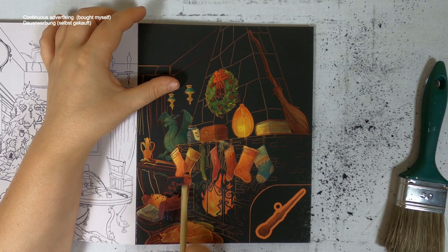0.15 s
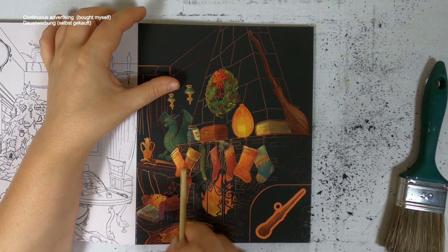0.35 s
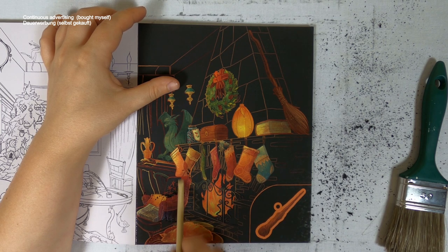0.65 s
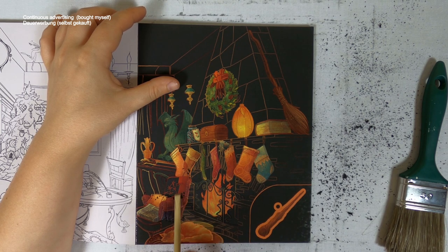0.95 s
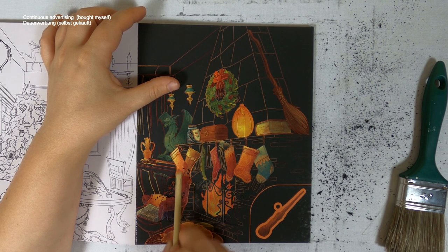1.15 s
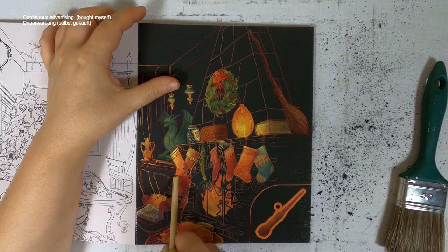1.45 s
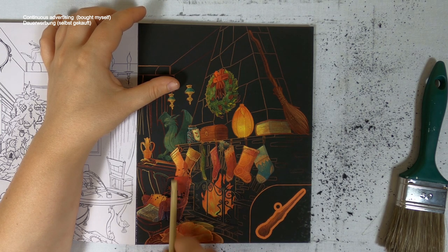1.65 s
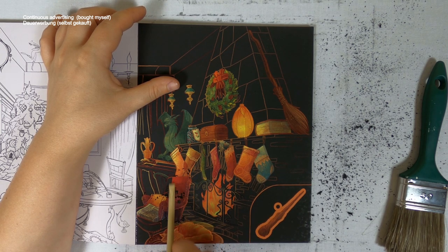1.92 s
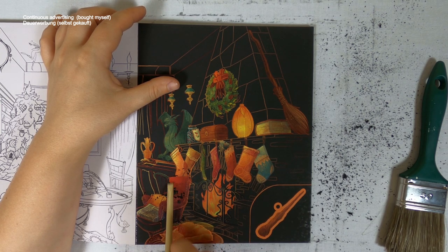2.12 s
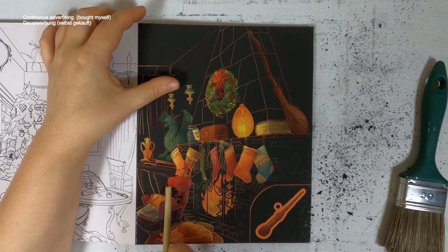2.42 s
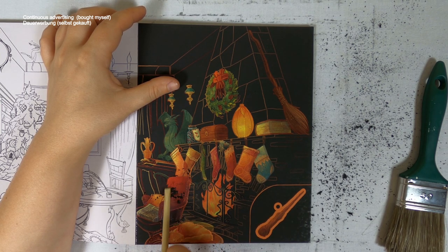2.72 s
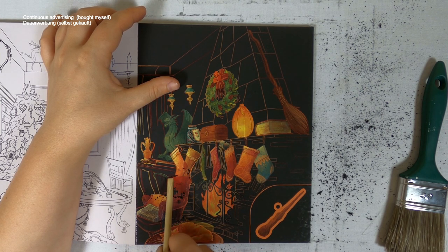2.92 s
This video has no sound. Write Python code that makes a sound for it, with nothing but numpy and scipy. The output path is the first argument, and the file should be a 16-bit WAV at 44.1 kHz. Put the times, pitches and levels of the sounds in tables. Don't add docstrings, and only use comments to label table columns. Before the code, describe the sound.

Close, dry scratching of a stick over card on a table: quick uneven strokes about three per second, stuttering catches, small knocks and gritty hiss, loudest in the first half, with faint low table thumps behind.

```python
import sys
import numpy as np
from scipy import signal
from scipy.fft import rfft, irfft, next_fast_len
from scipy.io import wavfile
from scipy.ndimage import uniform_filter1d, map_coordinates

SR = 44100
rng = np.random.default_rng(int(sys.argv[2]) if len(sys.argv) > 2 else 0)


def inscribe(sig):
    pcm = np.round(np.clip(np.atleast_2d(sig).T, -1, 1) * 32767)
    wavfile.write(sys.argv[1], SR, pcm.astype(np.int16))


def elevation(decibels):
    levels = np.asarray(decibels, float)
    return 10 ** (levels / 20)


N = 134505
T = np.arange(N) / SR

# frequency in Hz, level in dB per Hz.
AIR_SPECTRUM = [(95, -28.5), (145, 0), (330, -2.5), (700, -14.5), (2300, -23), (4000, -29.5), (8500, -31.5),
                (15600, -41)]
# time in seconds, gain in dB.
AIR_GAIN = [(0, 1), (.5, -0.5), (1.3, 1), (2.0, -1), (3.05, -1.5)]
AIR_DB, AIR_SWAY_DB = -65.5, 0.8
WHINE_HZ, WHINE_DB = 9950, -95

# frequency in Hz, level in dB per Hz.
ARM_SPECTRUM = [(12, -27), (22, -0.5), (40, 1), (52, -11.5), (85, -15.5), (105, -46), (200, -86)]
# time in seconds, level in dB.
ARM_EFFORT = [(0.0, -84), (0.14, -69.5), (0.25, -93), (0.74, -60), (0.79, -74), (0.87, -58.5), (0.96, -84),
              (1.05, -67), (1.24, -84), (1.44, -64), (1.63, -86), (1.83, -65), (1.9, -91), (1.95, -72.5),
              (2.46, -86), (2.6, -71), (2.77, -70.5), (2.9, -83), (3.05, -85)]
ARM_SWAY_DB = 2.5

# start in seconds, level in dB.
WRIST_NUDGES = [
    (0.576, -42.5),
    (1.301, -48),
    (1.776, -46),
    (0.289, -58),
    (0.779, -55.5),
    (1.93, -58),
    (2.52, -56.5),
    (2.8, -54),
]
NUDGE_T60 = 0.26

# centre in Hz, width in Hz, level in dB.
TABLE_MODES = [(35, 21, -13), (148, 22.4, 2.5), (242, 200, -10.5)]
# centre in Hz, width in Hz, level in dB.
CARD_MODES = [(265.7, 19.6, -10), (331.5, 18.2, -2.5), (397.2, 21, -5.5), (474, 36, -7), (619.4, 49, -3),
              (729, 59.7, -1.5), (842, 76, -6.5), (937.4, 55, -7), (1087, 151, -9), (1250, 96, -5.5),
              (1354.5, 57, -9.5), (1491, 49, -16), (1694, 54, -18.5), (1980, 30, -23.5)]
# centre in Hz, width in Hz, level in dB.
STYLUS_MODES = [(3460, 410, 3.5), (4700, 290, -8.5), (6250, 340, -1.5), (8800, 1200, -1.5),
                (12200, 410, -12)]
# centre in Hz, width in Hz, level in dB.
POINT_MODES = [(4630, 880, -0.5), (9120, 640, -5), (12140, 910, -7.5)]
# centre in Hz, width in Hz, level in dB.
SQUEAL_MODES = [(1250, 145, -3), (1460, 79, 0), (2760, 250, -13)]

# start in seconds, level in dB.
SKIDS = [
    (.185, -63),
    (.34, -60.5),
    (.372, -50),
    (0.428, -50.5),
    (0.769, -45.5),
    (1.1, -50),
    (1.134, -53),
]
SKID_T60 = 0.18

# time in seconds, peak in dB.
JOLTS = [(0.3984, -42.5), (0.5749, -28), (0.6241, -32.5), (.7445, -37.5), (.75, -40), (0.7628, -29.5),
         (.766, -37.5), (.96, -36.5), (1.0995, -29.5), (1.143, -43), (1.296, -32.5), (1.271, -42),
         (1.422, -43), (1.464, -38), (1.48, -38.5), (1.495, -44), (1.582, -43), (1.604, -40),
         (1.776, -40.5), (1.85, -38), (1.911, -51), (2.61, -53), (1.892, -42), (2.053, -41), (2.075, -40),
         (2.2, -57), (2.472, -36), (2.484, -42), (2.761, -44)]
CONTACT_S, JOLT_RING_DB, JOLT_SNAP_DB = 0.0002, 22.5, -4

# start in seconds, length in seconds, level in dB.
PUSHES = [
    (0.196, 0.095, -73),
    (0.537, 0.11, -57.5),
    (.9, 0.097, -59.5),
    (1.263, 0.095, -61),
    (1.557, .1, -65.5),
    (1.85, 0.098, -68),
    (2.153, 0.11, -71),
    (2.443, .1, -70),
    (2.73, 0.11, -73.5),
]

# time in seconds, peak in dB.
FLAKES = [(.375, -46.5), (0.397, -42.5), (0.5534, -44.5), (.5816, -58), (0.735, -50), (0.907, -49.5),
          (0.977, -52), (1.0846, -46), (1.275, -55), (1.8946, -65), (2.0503, -67), (2.465, -58),
          (0.7666, -36.5), (1.1038, -45), (1.1413, -44), (1.4253, -57), (1.494, -51), (1.588, -62),
          (1.655, -56), (1.7761, -54.5), (2.0761, -51.5), (2.7633, -57)]
FLAKE_DB, FLAKE_T60 = 5, 0.012

# start in seconds, length in seconds, hiss in dB, rasp in dB.
STROKES = [(.0, 0.097, -68, -61), (0.047, 0.086, -69, -56.5), (0.199, 0.097, -60, -47.5),
           (0.329, 0.055, -72, -59), (0.362, 0.085, -53, -51.5), (0.54, 0.1, -49, -39),
           (0.697, 0.088, -54.5, -43.5), (0.8, 0.3, -90, -61.5), (0.89, 0.12, -52.5, -48.5),
           (1.024, 0.2, -94, -60), (1.067, 0.11, -58, -56), (1.264, 0.094, -53.5, -42),
           (1.4, 0.057, -69, -47), (1.447, 0.07, -60.5, -42.5), (1.546, 0.11, -61.5, -43.5),
           (1.705, 0.069, -90, -58.5), (1.751, 0.053, -71, -50.5), (1.839, 0.11, -65, -45),
           (1.995, 0.07, -91, -58), (2.034, 0.066, -67.5, -49), (2.137, 0.1, -67, -46),
           (2.289, 0.099, -86, -60), (2.43, 0.11, -67, -48), (2.577, 0.093, -85, -61.5),
           (2.739, 0.099, -68, -53), (2.862, 0.12, -80.5, -60)]
RASP_RISE_S, HISS_RISE_S, FALL_S = 0.014, 0.026, 0.037
SWELL, HISS_LATE = 0.55, 1.6

# start in seconds, length in seconds, level in dB,
# first slip rate in Hz, last slip rate in Hz.
CATCHES = [(0.218, 0.03, -41, 1199, 680), (0.245, 0.048, -48, 480.5, 330), (0.366, 0.015, -34.5, 1394, 774),
           (0.387, 0.023, -33, 1366, 745), (0.549, 0.016, -31, 1105, 930), (0.561, 0.022, -32.5, 728, 696),
           (0.589, 0.039, -39.5, 777, 658), (0.605, 0.038, -38, 433, 341), (.712, .024, -35.5, 944, 795),
           (0.739, 0.018, -33.5, 794, 740), (0.738, 0.0137, -31, 1053, 1190),
           (0.759, 0.012, -30.5, 1323, 1153), (0.896, 0.033, -33.5, 1322, 681),
           (0.935, 0.038, -33, 1204, 628), (.946, 0.017, -35.5, 1323, 1250),
           (1.075, 0.0322, -35, 1150, 700), (1.118, 0.026, -37.5, 1057, 622), (1.27, 0.023, -33, 1331, 792),
           (1.284, 0.019, -34.5, 745, 730), (1.324, 0.069, -49, 423, 325), (1.402, 0.0314, -44.5, 694, 499),
           (1.458, 0.013, -35.5, 778, 646), (1.469, 0.036, -43, 514, 369),
           (1.573, 0.042, -41.5, 596.6, 848), (1.595, 0.053, -44.5, 498.6, 362),
           (1.752, 0.034, -42, 779.6, 722), (1.841, 0.04, -43.5, 447.6, 390),
           (1.878, 0.027, -44.5, 765, 681), (1.898, 0.042, -47.5, 410, 347), (2.039, 0.024, -38, 776, 665),
           (2.045, 0.036, -44.5, 441, 402), (2.149, 0.045, -40.5, 478.5, 423),
           (2.182, 0.052, -43.5, 404, 314.3), (2.42, 0.054, -47, 439.4, 486), (2.464, 0.026, -39, 830, 572),
           (2.488, 0.037, -44.5, 418.5, 322), (2.598, .055, -63, 735, 725), (2.724, 0.04, -44.5, 444, 502),
           (2.753, 0.012, -44.5, 703, 620), (2.78, 0.044, -49, 774, 743)]
CATCH_PEAK, CATCH_FIZZ_DB = 0.4, -30.5
JITTER, SIZE_DB = 0.092, 2.5
SHARP, SLOWS_LATE = 1.38, 1.1

GRAINS_PER_S, GRAIN_DB, GRAIN_SHARE, CLUMP_DB = 4000, 3, 0.35, 4
# frequency in Hz, level in dB per Hz.
FIZZ_SPECTRUM = [(1500, 2.5), (2000, -1.5), (2450, -10.5), (3000, -5.5), (4700, -12), (5600, -16.5),
                 (11500, -24), (15600, -43)]
RASP_FROM_HZ, TABLE_DB = 347, -18
# time in seconds, gain in dB.
LEAN_GAIN = [(0, -6), (1.3, -3.5), (1.9, 0.5), (3.05, -1)]
SING_DB, SING_GROWS = -32.5, 0.55

# frequency in Hz, T60 in seconds.
ROOM_DECAY = [(200, 0.28), (1000, 0.24), (4000, 0.28), (12000, 0.14)]
ROOM_DB = -12

# frequency in Hz, likeness from 0 to 1.
ALIKE = [(30, 0.87), (150, 0.9), (400, 1), (1500, 1), (3000, 0.86), (8000, 0.7), (14000, 0.18)]
# frequency in Hz, left over right in dB.
BALANCE = [(60, 1.5), (180, -2.5), (550, 0.0), (1650, 0), (4970, 2.5), (15000, -3.5)]
LAG_S, LAG_TOP_HZ, TOP_HZ = 5.5e-5, 6000, 15700


def unit(x):
    return x / np.sqrt(np.mean(x ** 2) + 1e-20)


def along(points, hz):
    f, v = np.transpose(points)
    return np.interp(np.log(hz + 1), np.log(f + 1), v)


def over_time(points):
    return np.interp(T, *np.transpose(points))


def wobble(rate):
    return map_coordinates(rng.standard_normal(int(N * rate / SR) + 4), [T * rate])


def filtered(x, response):
    m = next_fast_len(N + SR // 2)
    return irfft(rfft(x, m) * response(np.fft.rfftfreq(m, 1 / SR)), m)[..., :N]


def shaped_noise(spectrum):
    return unit(filtered(rng.standard_normal((2, N)), lambda hz: elevation(along(spectrum, hz))))


def modes(table):
    def response(f):
        total = 0
        for k, (centre, width, db) in enumerate(table):
            damping = 1j * f * width
            total = total + (-1) ** k * elevation(db) * damping / (centre ** 2 - f ** 2 + damping + 1e-9)
        return total
    return response


def dying(events, t60):
    return sum((T >= s) * elevation(db - 60 * np.abs(T - s) / t60) for s, db in events)


def paired(two, alike):
    def mid_side(hz):
        turn = np.arccos(np.clip(along(alike, hz), -1, 1)) / 2
        return np.array([np.cos(turn), np.sin(turn)])
    mid, side = filtered(two, mid_side)
    return np.array([mid + side, mid - side])


def room_air():
    level_db = AIR_DB + over_time(AIR_GAIN) + AIR_SWAY_DB * wobble(3.18)
    return paired(elevation(level_db) * shaped_noise(AIR_SPECTRUM), [(100, 0.31), (1000, 0.21), (8000, 0.052)])


def whine():
    return elevation(WHINE_DB + 2.5 * wobble(30)) * np.sin(2 * np.pi * WHINE_HZ * T)


def room(x):
    hz, t, z = signal.stft(rng.standard_normal((2, SR // 2)), SR, nperseg=256)
    tail = signal.istft(z * elevation(-60 * t / along(ROOM_DECAY, hz)[:, None]), SR, nperseg=256)[1]
    delayed = np.pad(x, (300, 0))[None]
    return signal.fftconvolve(delayed, tail / np.linalg.norm(tail[0]), axes=1)[:, :N]


def arm():
    effort_db = over_time(ARM_EFFORT) + ARM_SWAY_DB * wobble(9.35)
    return paired(elevation(effort_db) * shaped_noise(ARM_SPECTRUM), ALIKE)


def wrist():
    push = dying(WRIST_NUDGES, NUDGE_T60)
    return filtered(elevation(18) * push * rng.standard_normal(N), modes(TABLE_MODES))


def grit():
    noise, chance = rng.standard_normal((2, N)), rng.random((2, N))
    size = np.minimum(rng.exponential(1, (2, N)), 3.5)
    grains = unit((chance < GRAINS_PER_S / SR) * np.sign(noise) * elevation(GRAIN_DB * size))
    return np.sqrt(GRAIN_SHARE) * grains + np.sqrt(1 - GRAIN_SHARE) * noise


def clumped(x):
    z = signal.stft(x, nperseg=256)[2]
    field = uniform_filter1d(rng.standard_normal(z.shape[1:]), size=3, axis=0)
    field = uniform_filter1d(field, size=6, axis=1)
    return signal.istft(z * elevation(CLUMP_DB * unit(field)), nperseg=256)[1][:, :N]


def flakes():
    total = np.zeros((2, N))
    for s, db in FLAKES:
        total += dying([(s, db + FLAKE_DB)], FLAKE_T60) * rng.standard_normal((2, N))
    return total


def skid():
    return dying(SKIDS, SKID_T60) * unit(filtered(grit(), modes(SQUEAL_MODES)))


def jolts():
    blows = np.zeros(N)
    for s, db in JOLTS:
        u = (T - s) / CONTACT_S
        blows -= elevation(db) * u * np.exp(-u ** 2)
    return elevation(JOLT_SNAP_DB) * blows + elevation(JOLT_RING_DB) * filtered(blows, modes(CARD_MODES))


def pushes():
    swell = np.zeros(N)
    for s, length, db in PUSHES:
        swell += elevation(db) * np.sin(np.pi * np.clip((T - s) / length, 0, 1)) ** 1.2
    shaving = unit(filtered(clumped(grit()), lambda hz: modes(POINT_MODES)(hz) ** 2))
    return swell * elevation(2.7 * wobble(200)) * shaving


def pressure(column, rise_s, late=1.0):
    total = np.zeros(N)
    for row in STROKES:
        t, length = T - row[0] + RASP_RISE_S / 2, row[1]
        bite = np.clip(t / rise_s, 0, 1)
        lift = np.clip((length - t) / FALL_S + 0.5, 0, 1)
        arch = np.sin(np.pi * np.clip(t / length, 0, 1) ** late)
        total += elevation(row[column]) * (bite * lift) ** 2 * np.abs(1 - SWELL + SWELL * arch)
    return total


def chatter():
    force, strength = np.zeros(N), np.zeros(N)
    unsteady, size = np.exp(JITTER * wobble(350)), elevation(SIZE_DB * wobble(500))
    for s, length, db, hz, last_hz in CATCHES:
        span = slice(round(s * SR), round((s + length) * SR))
        u = (T[span] - s) / length
        rate = hz * (last_hz / hz) ** np.abs(u) ** SLOWS_LATE * unsteady[span]
        slips = np.exp(SHARP * np.cos(2 * np.pi * np.cumsum(rate) / SR))
        ramp = np.clip(np.minimum(u / CATCH_PEAK, (1 - u) / (1 - CATCH_PEAK)), 0, 1)
        shape = elevation(db) * np.sin(np.pi / 2 * ramp) ** 0.57
        force[span] += shape * unit(slips - slips.mean()) * size[span]
        strength[span] += shape
    return force, strength


def rasp(x):
    def response(hz):
        low_cut = 1j * hz / (RASP_FROM_HZ + 1j * hz)
        return modes(CARD_MODES)(hz) * low_cut + elevation(TABLE_DB) * modes(TABLE_MODES)(hz)
    return filtered(x, response)


def fizz(x):
    return filtered(x, lambda hz: elevation(along(FIZZ_SPECTRUM, hz)) * np.clip(hz / 1500, 0, 1) ** 4)


def sing(hiss):
    tone = unit(filtered(grit(), lambda hz: modes(STYLUS_MODES)(hz) ** 2))
    return tone * elevation(SING_DB + over_time(LEAN_GAIN)) * hiss ** SING_GROWS


def stylus():
    force, strength = chatter()
    low, high = grit(), clumped(grit())
    uneven = elevation(1.17 * wobble(60))
    hiss = pressure(column=2, rise_s=HISS_RISE_S, late=HISS_LATE)
    rubbing = low * pressure(column=3, rise_s=RASP_RISE_S) * uneven
    tearing = high * (hiss * uneven + elevation(CATCH_FIZZ_DB) * strength) + flakes()
    body = rasp(rubbing) / rasp(low).std()
    air = fizz(tearing) / fizz(high).std()
    ring = elevation(6.5) * filtered(force, modes(CARD_MODES))
    struck = (ring + jolts()) * [[1], [0.6]]
    return body + struck + air + sing(hiss) + pushes() + skid()


def scene():
    scrape = stylus()
    answer = elevation(ROOM_DB) * paired(room(scrape[0]), [(300, 1.0), (3000, 0.25)])
    return paired(scrape, ALIKE) + answer + room_air() + arm() + whine() + wrist()


def low_pass(x):
    return signal.sosfilt(signal.butter(12, 15700, fs=SR, output="sos"), x)


def record(dry):
    side = np.array([[0.5], [-0.5]])

    def pair(hz):
        lag = LAG_S * side / (1 + (hz / LAG_TOP_HZ) ** 2)
        return (hz < TOP_HZ) * elevation(side * along(BALANCE, hz)) * np.exp(-2j * np.pi * hz * lag)
    return low_pass(filtered(dry, pair))


dry = scene()
out = record(dry)
inscribe(out)
```